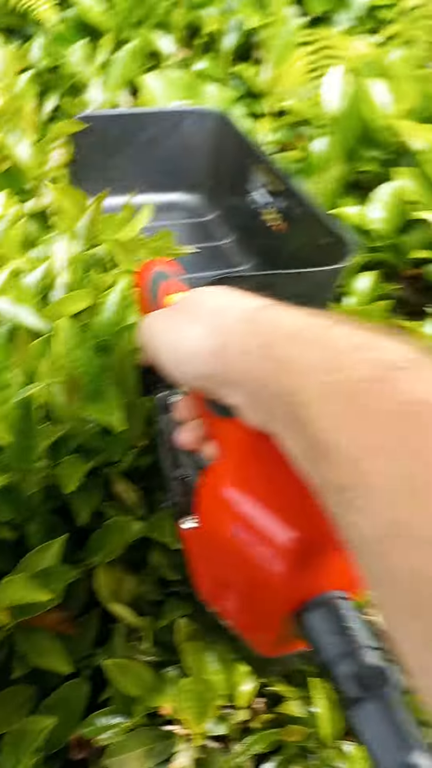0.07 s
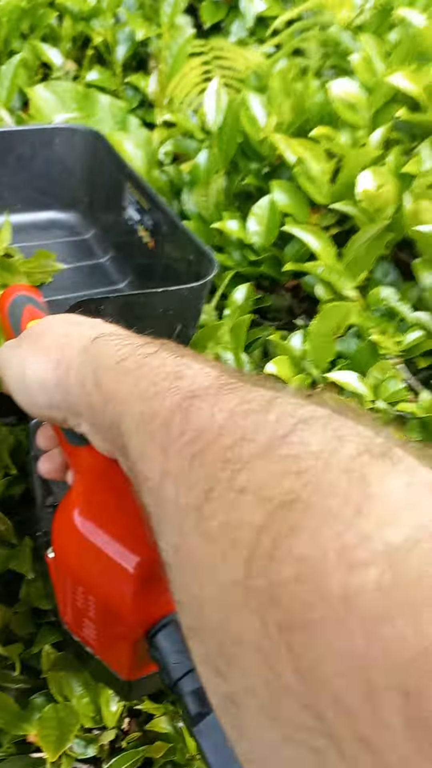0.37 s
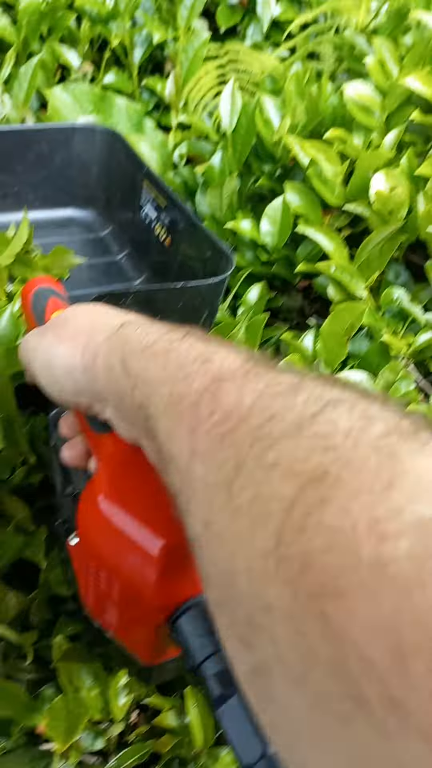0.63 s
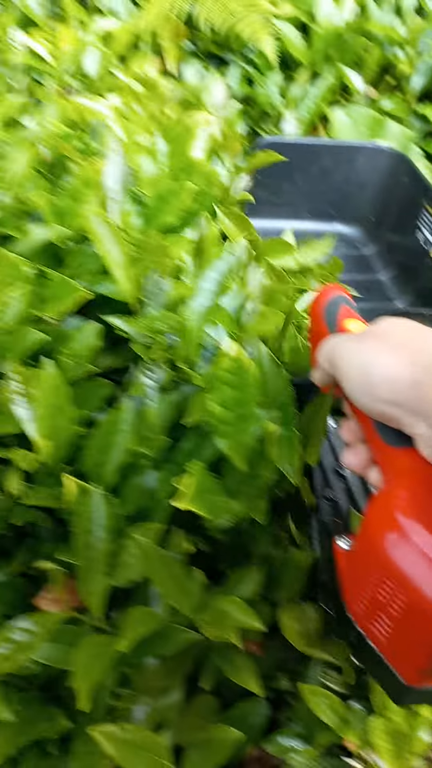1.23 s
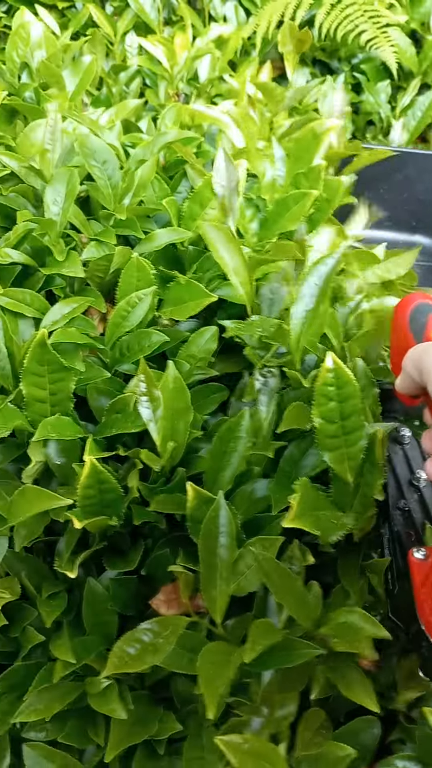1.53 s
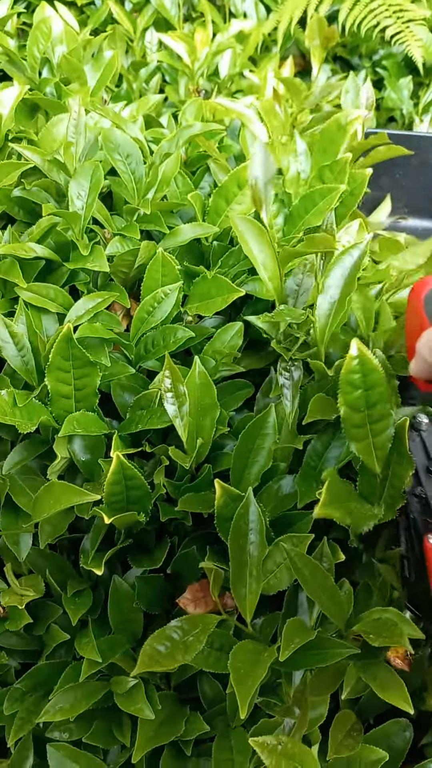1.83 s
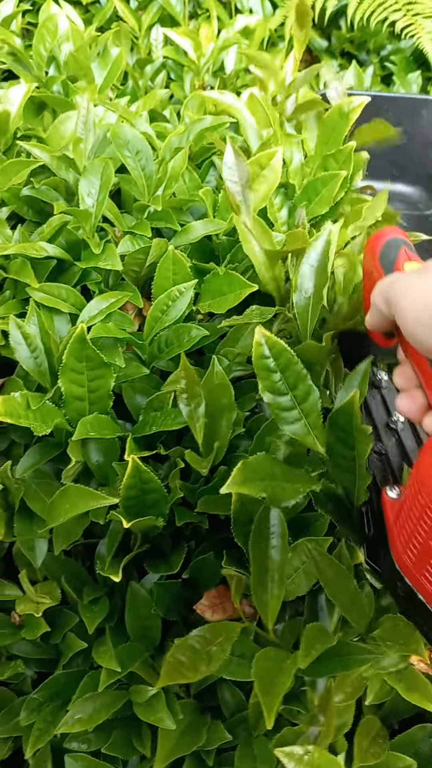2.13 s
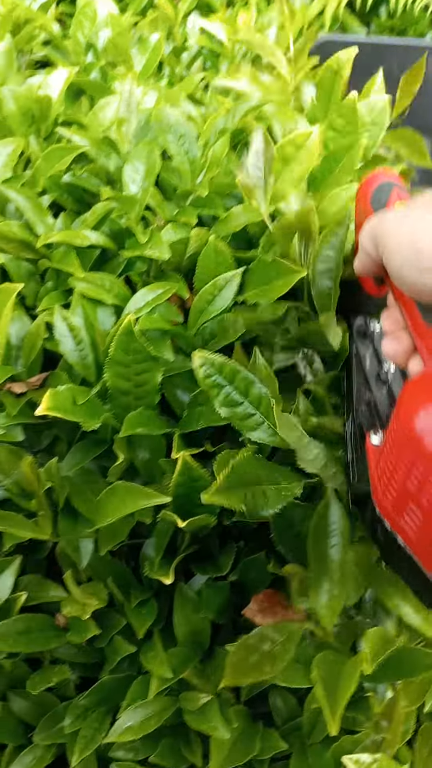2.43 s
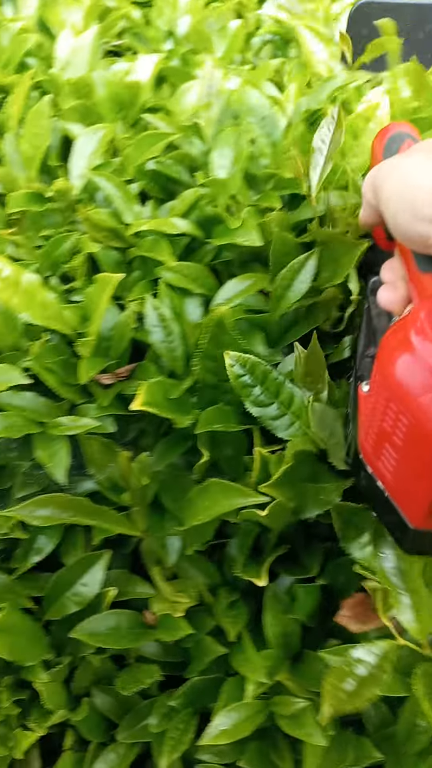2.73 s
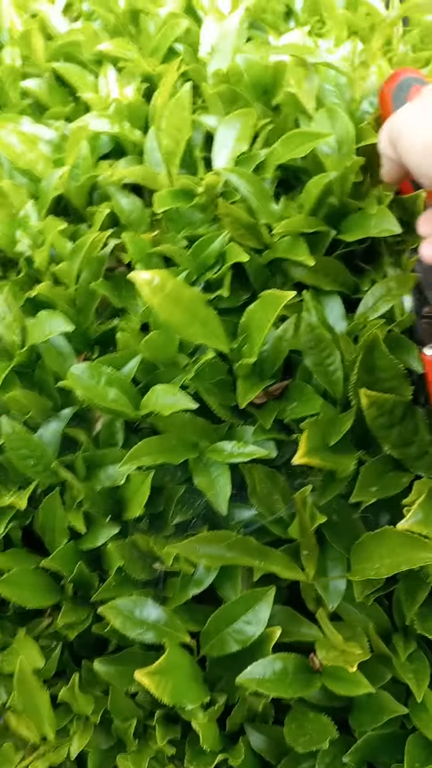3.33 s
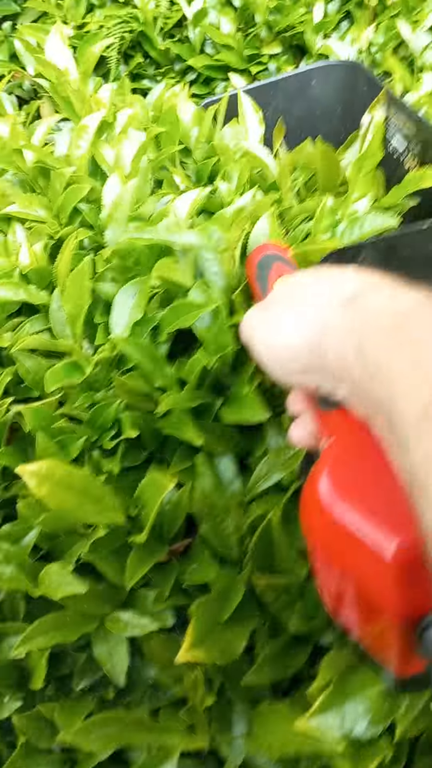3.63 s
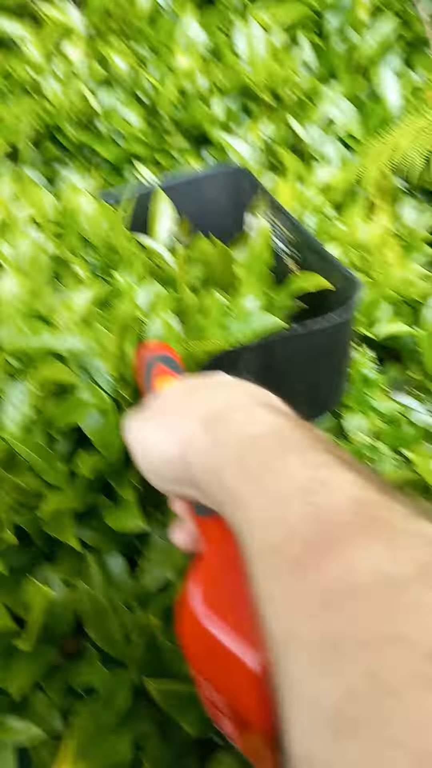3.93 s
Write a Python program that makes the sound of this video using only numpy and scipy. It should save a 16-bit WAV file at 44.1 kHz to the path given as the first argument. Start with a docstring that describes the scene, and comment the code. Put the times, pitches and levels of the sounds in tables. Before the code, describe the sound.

A handheld electric tea harvester runs close by outdoors. It starts with uneven clacking, slowing around 0.6 seconds with faint blade squeaks, quickening near 0.9 and sagging again. At about 1.4 seconds it revs up into a louder, fast, buzzing chatter with a gear whine and rattle. It holds that speed until the end at 4 seconds, the steel blades hissing and snipping through leaves.

```python
"""An uneven clacking idle rises to a fast, whining, hissing chatter: a handheld electric tea harvester,
close by outdoors, first on a light trigger, then revving up and cutting. One speed drives it:
the blades knock at each reversal, gear teeth whine and rattle in the plastic housing,
and the steel blades hiss as they slide and snip through leaves."""
import sys
import numpy as np
from scipy import signal
from scipy.fft import rfft, irfft, next_fast_len
from scipy.io import wavfile
from scipy.ndimage import uniform_filter1d, map_coordinates

SR = 44100
rng = np.random.default_rng(int(sys.argv[2]) if len(sys.argv) > 2 else 0)


def master_out(mix):
    """Clip the mix to full scale and print it as 16-bit PCM to the path in sys.argv[1]."""
    frames = np.transpose(np.atleast_2d(mix))
    ceiling = np.clip(frames, -1, 1)
    pcm = np.round(ceiling * 32767).astype(np.int16)
    wavfile.write(sys.argv[1], SR, pcm)


N = 176400

# Blade speed: time_s, stroke_hz
SPEED = [(0.0, 27.16), (0.2, 24.74), (0.4, 21.56), (0.57, 15.64), (0.69, 16.49), (0.78, 31.12),
         (0.9, 40.79), (1.02, 37.21), (1.16, 24.63), (1.29, 18.01), (1.41, 45.15), (1.53, 56.89),
         (1.69, 61.56), (1.8, 61.05), (2.02, 59.43), (2.32, 59.39), (2.53, 60.65), (2.77, 59.01),
         (3.09, 62.69), (3.33, 59.2), (3.75, 59.68), (4.0, 59.4)]
# Tool rocking at 1x and 3x stroke rate: time_s, first_db, third_db
HUM_LEVELS = [(1.2, -98, -98), (1.5, -80, -63), (1.75, -76, -51.5), (2.45, -73, -58.5), (2.7, -66.5, -64),
              (2.88, -70, -53), (3.2, -84, -64), (4, -69.5, -66)]
# Housing drone: stroke_multiple, level_db
DRONE_PARTIALS = [(7, -61.5), (9, -51.5), (11.5, -54.5), (13.5, -51.5), (19, -48.5)]
# Blade squeaks: centre_s, length_s, pitch_hz, level_db
SQUEAKS = [(0.416, 0.02, 1040, -42), (0.65, 0.029, 1075, -40)]
# High blade resonance: time_s, level_db
SIZZLE_LEVEL = [(0, -62), (.7, -79), (.95, -45.5), (1.15, -68), (1.4, -53), (1.9, -48.5), (2.2, -43.5),
                (2.85, -49.5), (3.25, -42), (3.65, -49), (4, -45)]
# Free ringing of the tool: centre_hz, width_hz, gain_db
RING_MODES = [(388.3, 28.5, 2), (1068, 150, -2), (1900, 97, 0.5), (3240, 650, -3.5), (5060, 460, -3.5)]
# Free ringing: time_s, level_db
RING_LEVEL = [(0, -50.5), (.5, -46), (.6, -53.5), (.65, -48.5), (.95, -45), (1.25, -51), (2, -38),
              (2.4, -41), (4, -47)]
# Tones on the two main housing resonances: stroke_multiple
SINGING_ORDERS = [16, 17, 22.5]
# Those three tones: time_s, low_db, middle_db, high_db
SINGING_LEVELS = [(1.35, -77, -70, -80), (1.7, -48, -52, -39.5), (1.95, -48, -48, -41.5),
                  (2.5, -50, -41.5, -46), (2.85, -50, -50.5, -56), (3.2, -41, -44, -57),
                  (3.7, -57, -38, -41), (4, -62, -39.5, -55)]
# Blade hiss: time_s, level_db
HISS_LEVEL = [(0, -51), (.34, -50), (.65, -57), (.72, -50), (.97, -41.5), (1.17, -53), (1.25, -52),
              (1.44, -39), (2.53, -38), (2.9, -38.5), (4, -40)]
# Blade hiss spectrum: freq_hz, gain_db
HISS_COLOUR = [(100, -22), (2500, 5), (5000, -16), (6500, 0.5), (8000, 3), (8700, -1.5), (9600, 2.5),
               (10600, 0.5), (12000, 0), (13600, 2.5), (15000, -4), (16000, -2.5)]
# Gear rattle: time_s, level_db
RATTLE_LEVEL = [(0, -41.5), (.2, -45), (.42, -46), (.58, -52), (.68, -54), (.76, -41.5), (.86, -38),
                (.97, -36.5), (1.1, -42), (1.28, -47.5), (1.36, -41.5), (1.45, -32.5), (1.7, -34),
                (2.2, -34), (2.7, -32.5), (4, -32.5)]
# Rattle and crunch spectrum: freq_hz, gain_db
RATTLE_COLOUR = [(30, -30.5), (120, -29), (190, -3), (270, -10.5), (400, -3.5), (600, -1.5), (830, -1),
                 (1050, 5.5), (1400, 4.5), (1700, -1), (2050, -0.5), (2450, 1), (2750, -0.5), (3200, 0.5),
                 (3800, -2.5), (4500, -1.5), (5150, -10), (5900, -9), (8000, -28), (15000, -18.5)]
# Gear mesh: tooth_multiple, gain_db, waver_rad
MESH_PARTIALS = [(1, 2, 0.28), (2, -15, .3), (3, 2, 0.41)]
# Gear whine: time_s, level_db
WHINE_LEVEL = [(0, -49.5), (.5, -51), (.65, -68.5), (.8, -52.5), (1.35, -49.5), (1.52, -37.5),
               (1.72, -34.5), (2.4, -35.5), (2.8, -38), (3.3, -43.5), (3.65, -41.5), (4, -36)]
# Highest mesh partial: time_s, extra_db
WHINE_TOP = [(0, -3.5), (.6, -3), (.78, 6.5), (1.1, -1.5), (1.45, 8.5), (1.7, 0), (1.9, 0), (2.15, -10),
             (4, -11)]
# Housing response to the whine: freq_hz, gain_db
WHINE_COLOUR = [(200, -17), (390, -0.5), (470, -17), (600, -8), (800, -4.5), (1080, 5), (1230, 5),
                (1420, -3), (1800, -2), (2400, -0.5), (2800, -14), (3550, -8.5), (4000, -22), (4185, -8),
                (4260, -6), (4340, -5.5), (4430, -19)]
# Housing response to a blow: freq_hz, gain_db
HOUSING_COLOUR = [(40, -62.5), (130, -20), (190, -11.5), (260, -12), (400, -7), (600, -6), (860, -12),
                  (1020, 5), (1200, 0), (1380, 5.5), (1700, -7.5), (2400, -4.5), (3200, -14.5),
                  (5000, -10.5), (7000, -23), (15000, -37)]
# Housing resonances: centre_hz, width_hz, gain_db
HOUSING_MODES = [(1080, 85, -5), (1400, 370, -9), (2426, 145, 1)]
# Single reversals at low speed: start_s, level_db
CLACKS = [(0.025, -23), (0.064, -21), (0.102, -21), (0.141, -22), (0.18, -26), (0.221, -22), (0.262, -25),
          (0.305, -23), (0.349, -28), (0.394, -25), (0.441, -29), (0.493, -29), (0.615, -30), (0.674, -30),
          (0.731, -24), (0.768, -24), (0.801, -23), (0.83, -24), (0.857, -20), (0.884, -24), (0.907, -20),
          (0.935, -23), (0.958, -19), (0.985, -23), (1.011, -23), (1.039, -26), (1.067, -22), (1.099, -22),
          (1.134, -21), (1.173, -23), (1.218, -23), (1.266, -26), (1.314, -23), (1.351, -22), (1.381, -20)]
# Reversals at running speed: time_s, level_db
KNOCK_LEVEL = [(1.4, -37.5), (1.55, -36.5), (2.3, -33), (2.6, -36), (3.1, -44), (3.4, -42), (3.8, -41),
               (4, -49)]
# Left-right likeness: freq_hz, correlation
COHERENCE = [(100, 1), (500, 0.67), (1200, 0.46), (2200, 0.079), (4000, -0.089), (15000, 0.073)]
# Stereo balance: freq_hz, left_minus_right_db
BALANCE = [(60, 1), (150, -1), (600, 3), (1200, -1), (2200, -0.3), (4500, -5), (14000, -4.5)]
# Movement of the tool: time_s, left_minus_right_db
SWING = [(0, 1.4), (1.5, 2.5), (2.2, 2), (2.8, 4), (3.3, 3), (4, 1.5)]

FULL_HZ, TEETH_PER_STROKE, REBOUND_S = 60, 23.5, 0.0029
TIME_S = np.arange(N) / SR
SIDES = np.array([[1], [-1]])


def amp(db):
    """Decibels to gain."""
    return 10 ** (np.asarray(db) / 20)


def unit(x):
    """Scale to rms 1."""
    return x / np.sqrt(np.mean(x ** 2) + 1e-20)


def along(points, hz):
    """Interpolate (freq_hz, value) rows on a log axis."""
    freq_hz, values = np.transpose(points)
    return np.interp(np.log(hz + 1), np.log(freq_hz + 1), values)


def curve(rows):
    """One value per sample from (time_s, value) rows."""
    return np.interp(TIME_S, *np.transpose(rows))


def noise():
    """Two independent white noises."""
    return rng.standard_normal((2, N))


def wobble(rate_hz):
    """Smooth random curve with knots at rate_hz."""
    grid = np.arange(0, N + 32, 32)
    values = map_coordinates(rng.standard_normal(2000), [grid * rate_hz / SR], mode="wrap")
    return np.interp(np.arange(N), grid, values)


def filtered(x, response):
    """Apply a complex frequency response."""
    size = 2 * next_fast_len(N // 2 + 8192)
    return irfft(rfft(x, size) * response(np.fft.rfftfreq(size, 1 / SR)), size)[..., :N]


def causal(points, hz):
    """Minimum-phase response through (freq_hz, gain_db) rows."""
    cepstrum = irfft(np.log(amp(along(points, hz))))
    half = len(cepstrum) // 2
    cepstrum[1:half] *= 2
    cepstrum[half + 1:] = 0
    return np.exp(rfft(cepstrum))


def resonance(hz, centre_hz, width_hz):
    """Band-pass response of one damped mode."""
    return 1j * hz * width_hz / (centre_hz ** 2 - hz ** 2 + 1j * hz * width_hz)


def pulses(at_s, size):
    """Impulses, each shared between two adjacent samples."""
    at = np.clip(at_s * SR, 0, N - 2)
    i = at.astype(int)
    return np.bincount(i, size * (1 - at + i), N) + np.bincount(i + 1, size * (at - i), N)


def crossings_s(cycles):
    """Times at which a cycle count passes whole numbers."""
    return np.interp(np.arange(1, int(cycles[-1]) + 1), cycles, TIME_S)


def spread(pair):
    """Two signals to stereo, alike in the bass; mid rms 1."""
    angle_rad = lambda hz: np.arccos(np.clip(along(COHERENCE, hz), -1, 1)) / 2
    mid, side = filtered(pair, lambda hz: np.array([np.ones(len(hz)), np.tan(angle_rad(hz))]))
    return np.array([mid + side, mid - side]) / np.std(mid)


def air(level_db=-68):
    """Faint outdoor background."""
    colour = lambda hz: amp(along([(30, -8), (500, -5), (10000, -12)], hz))
    return amp(level_db) * spread(filtered(noise(), colour))


def hum(stroke):
    """The whole tool rocks with the blades."""
    rows = np.array(HUM_LEVELS)
    first = amp(curve(rows[:, [0, 1]])) * np.sin(2 * np.pi * stroke)
    third = amp(curve(rows[:, [0, 2]])) * np.sin(6 * np.pi * stroke)
    return np.sqrt(2) * (first + third * amp(wobble(6.6)))


def drive_whistle(speed_hz, stroke, carrier_hz=16080, sideband_order=21, level_db=-55.5):
    """The motor drive's switching tone sinks with rising speed and stops at full power."""
    phase = 2 * np.pi * (carrier_hz * TIME_S - sideband_order * stroke)
    switching = 1 - np.minimum(speed_hz / FULL_HZ, 1) ** 8
    pair = [amp(level_db + 2 * wobble(29.7)) * np.sin(phase + 0.97 * wobble(150)) for _ in range(2)]
    return switching * np.array(pair)


def drone(speed_hz, stroke, side_rad=0.99):
    """Near full speed the swinging blades shake the housing at multiples of their rate."""
    tones = np.zeros((2, N))
    for order, db in DRONE_PARTIALS:
        gain = amp(db + 1.3 * wobble(3.97))
        phase = 2 * np.pi * order * stroke + 0.25 * wobble(6)
        tones += gain * np.sin(phase + side_rad * wobble(2.196) * SIDES)
    return np.sqrt(2) * tones * np.minimum(speed_hz / FULL_HZ, 1) ** 8


def squeaks():
    """At a crawl the dry blades stick and squeak."""
    out = np.zeros(N)
    for centre_s, length_s, pitch_hz, db in SQUEAKS:
        envelope = amp(db) * np.exp(-(2 * (TIME_S - centre_s) / length_s) ** 2)
        out += envelope * np.sin(2 * np.pi * pitch_hz * TIME_S + 0.48 * wobble(150.5))
    return np.sqrt(2) * out


def sizzle(stroke, centre_hz=9430, width_hz=1170, depth=0.39):
    """A high blade resonance flares as the edges scrape."""
    scrape = (1 + depth * np.cos(2 * np.pi * stroke)) * amp(1.6 * wobble(120))
    band = filtered(noise(), lambda hz: resonance(hz, centre_hz, width_hz) ** 2)
    return spread(band) * scrape * amp(curve(SIZZLE_LEVEL))


def free_ring(flicker_db=2.5):
    """Rubbing keeps blades and housing ringing."""
    modes = lambda hz: sum(amp(db) * resonance(hz, centre, width) ** 2 for centre, width, db in RING_MODES)
    return spread(filtered(noise(), modes)) * amp(curve(RING_LEVEL) + flicker_db * wobble(50))


def singing(stroke, knocking, side_rad=0.54):
    """The two main housing resonances sound in phase with the knocks, at multiples of their rate."""
    rows, out = np.array(SINGING_LEVELS), np.zeros((2, N))
    for column, order in enumerate(SINGING_ORDERS, 1):
        phasor = np.exp(2j * np.pi * order * stroke)
        knock_rad = np.angle(np.sum(knocking * phasor.conj()))
        tone = np.real(phasor * np.exp(1j * (knock_rad + side_rad * SIDES)))
        out += amp(curve(rows[:, [0, column]])) * tone
    return np.sqrt(2) * out


def roughness(stroke, points_per_turn=1470, wear_turns=13):
    """Surface texture that returns every crank turn (two strokes) and slowly changes."""
    turns = stroke / 2
    surfaces = rng.standard_normal((2, 32, points_per_turn))
    position = [turns / wear_turns, turns % 1 * points_per_turn]
    return unit(np.array([map_coordinates(surface, position, mode="mirror") for surface in surfaces]))


def shifting_resonances(x, depth_db):
    """Resonances come and go as the tool moves among the leaves."""
    spectrum = signal.stft(x, nperseg=512)[2]
    field = rng.standard_normal(spectrum.shape[1:])
    for _ in range(2):
        field = uniform_filter1d(uniform_filter1d(field, size=3, axis=0), size=45, axis=1)
    return signal.istft(spectrum * amp(depth_db * unit(field)), nperseg=512)[1][:, :N]


def blade_hiss(speed_hz, stroke, burst_s=0.0037, snips_per_s=260, snip_s=0.00023, snip_db=-4.5):
    """Steel slides on steel each stroke; leaves and stems snap between the teeth."""
    burst = 0.75 * np.exp(-(stroke % 1) / speed_hz / burst_s)
    slide = 1 + 0.036 * np.cos(2 * np.pi * (stroke - 0.36)) + burst
    friction = noise() + amp(-1) * roughness(stroke)
    rub = unit(friction * slide * amp(0.89 * wobble(200) + 0.8 * wobble(35)))
    snapped = rng.random(N) < snips_per_s / SR * speed_hz / FULL_HZ
    snaps = snapped * amp(2.3 * np.minimum(rng.exponential(size=N), 2))
    snips = unit(signal.lfilter([1], [1, -np.exp(-1 / (snip_s * SR))], snaps) * noise())
    pair = filtered(rub + amp(snip_db) * snips, lambda hz: causal(HISS_COLOUR, hz))
    return spread(pair) * amp(curve(HISS_LEVEL))


def gear_rattle(speed_hz, stroke, burst_s=0.0047, jitter_s=0.00012, tooth_db=-6, noise_db=-9):
    """Crank rubbing and loose tooth impacts, flaring after each reversal."""
    at_s = crossings_s(stroke * TEETH_PER_STROKE)
    scatter = rng.standard_normal((6000, 4))[:len(at_s)].T
    sizes = amp(3 * np.tanh(scatter[2:])) * np.sign(scatter[[3, 2]])
    teeth = np.array([pulses(at_s + jitter_s * scatter[i], sizes[i]) for i in range(2)])
    source = roughness(stroke) + amp(tooth_db) * unit(teeth / np.sqrt(speed_hz)) + amp(noise_db) * noise()
    pace = speed_hz / FULL_HZ
    age_s = (stroke - 0.06 * pace) % 1 / speed_hz
    flare = uniform_filter1d(1 + 1.5 * pace ** 2 * np.exp(-age_s / burst_s), size=60)
    pair = filtered(source * flare * amp(1.4 * wobble(110)), lambda hz: causal(RATTLE_COLOUR, hz))
    return spread(pair) * amp(curve(RATTLE_LEVEL) + 0.5)


def gear_whine(speed_hz, stroke, load_depth=0.96, lag_strokes=0.56, chatter_hz_per_s=60, side_rad=0.66):
    """Mesh tones swell as the crank takes load; teeth chatter in their play as the speed changes."""
    load = 1 + load_depth * np.cos(2 * np.pi * (stroke - lag_strokes))
    accel_hz_per_s = uniform_filter1d(np.gradient(speed_hz), size=4000) * SR
    backlash_rad = 0.7 * np.tanh(np.abs(accel_hz_per_s) / chatter_hz_per_s)
    out = np.zeros((2, N))
    for harmonic, db, waver_rad in MESH_PARTIALS:
        order = harmonic * TEETH_PER_STROKE
        phase = 2 * np.pi * order * stroke + waver_rad * wobble(90) + backlash_rad * wobble(260)
        top_db = curve(WHINE_TOP) * (harmonic == len(MESH_PARTIALS))
        gain = amp(db + top_db + along(WHINE_COLOUR, order * speed_hz) + 1.55 * wobble(24.92))
        out += gain * np.sin(phase + side_rad * SIDES)
    return np.sqrt(2) * out * load * amp(curve(WHINE_LEVEL))


def housing(hz, bend_hz=1159, bend_width_hz=865):
    """Plastic housing response; bending waves near bend_hz cross slowly, so a blow swells, then dies."""
    ring = 1 + sum(amp(db) * resonance(hz, centre, width) for centre, width, db in HOUSING_MODES)
    bend = bend_hz ** 2 - hz ** 2 + 1j * hz * bend_width_hz
    return causal(HOUSING_COLOUR, hz) * ring * (bend.conj() / bend) ** 2


def clacks(speed_hz, lag_s=0.00064, blow_db=-4.5, rebound_db=-9.5, crunch_db=-6, crunch_s=0.0059):
    """Slow reversals, heard singly: a blow on the housing and a steel crunch that grows with speed."""
    starts_s, db = np.transpose(CLACKS)
    at_s = starts_s + lag_s
    scatter = rng.standard_normal((len(at_s), 3)).T
    rebound = pulses(at_s + REBOUND_S + 0.00043 * scatter[0], amp(db + rebound_db + 2.5 * scatter[1]))
    off_axis = pulses(at_s + 0.00059 + 0.00032 * scatter[2], amp(db - 7))
    blows = np.array([pulses(at_s, amp(db)) + rebound, off_axis])
    peak = np.abs(irfft(housing(np.fft.rfftfreq(4096, 1 / SR)))).max()
    mid, side = amp(blow_db) / peak * filtered(blows, housing)
    swell = np.zeros(N)
    for start_s, level_db in CLACKS:
        pace = speed_hz[int(start_s * SR)] / FULL_HZ
        age = np.clip((TIME_S - start_s) / (crunch_s * pace), 0, 20)
        swell += amp(level_db) * pace ** 1.28 * (age * np.exp(1 - age)) ** 2
    crunch = spread(filtered(noise(), lambda hz: amp(along(RATTLE_COLOUR, hz))))
    return np.array([mid + side, mid - side]) + amp(crunch_db) * swell * crunch


def knocks(speed_hz, stroke, start_s=1.395, lag_s=0.001113, contact_s=0.0006, return_db=-3, rebound_db=-4):
    """Running blades hit the end of their play at each reversal, rebound once and ring the housing."""
    at_s = crossings_s(stroke)
    at_s = at_s[at_s > start_s]
    scatter = rng.standard_normal((400, 8))[:len(at_s)].T
    is_return = np.arange(len(at_s)) % 2 == 0
    size = amp(return_db * is_return + 0.93 * scatter[0])
    at_s = at_s + lag_s * speed_hz[(at_s * SR).astype(int)] / FULL_HZ + 0.00004 * scatter[1]
    blow = pulses(at_s, size) - pulses(at_s - contact_s, size * amp(-21 + 2 * scatter[7]))
    rebound = pulses(at_s + REBOUND_S + 0.00019 * scatter[2], size * amp(rebound_db + 2 * scatter[3]))
    off_axis = pulses(at_s + 0.00126 + 0.00017 * scatter[4], size * amp(-5 + 3.6 * scatter[5]))
    off_axis -= pulses(at_s + 0.0014 + 0.00054 * scatter[6], size * amp(-3))
    pair = filtered(np.array([blow + rebound, off_axis]), housing)
    return spread(pair) * amp(curve(KNOCK_LEVEL)) * np.sqrt(1 - start_s * SR / N)


def scene():
    """The harvester, moving a little in front of the listener."""
    speed_hz = curve(SPEED)
    stroke = 0.29 + np.cumsum(speed_hz) / SR  # blades reverse at whole numbers
    knocking = knocks(speed_hz, stroke)
    tones = gear_whine(speed_hz, stroke) + drone(speed_hz, stroke) + singing(stroke, knocking)
    tones += hum(stroke) + drive_whistle(speed_hz, stroke)
    rubbing = gear_rattle(speed_hz, stroke) + blade_hiss(speed_hz, stroke)
    rubbing = shifting_resonances(rubbing, depth_db=1.23)
    tool = tones + rubbing + clacks(speed_hz) + knocking + free_ring() + squeaks() + sizzle(stroke)
    placed = filtered(tool, lambda hz: amp(SIDES / 2 * along(BALANCE, hz)))
    return placed * amp(SIDES / 2 * curve(SWING)) + air()


def record(dry):
    """Brick-wall low-pass."""
    return filtered(dry, lambda hz: hz < 15950)


dry = scene()
out = record(dry)
master_out(out)
```